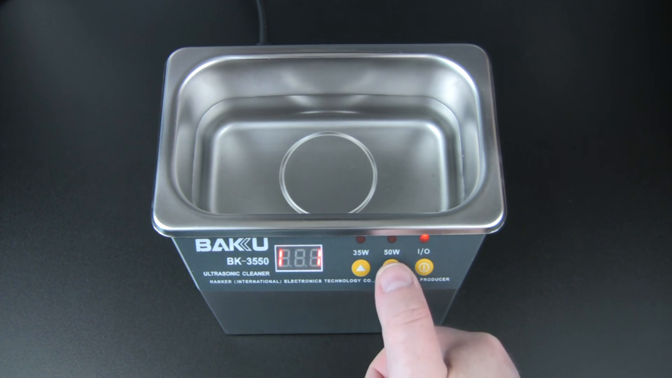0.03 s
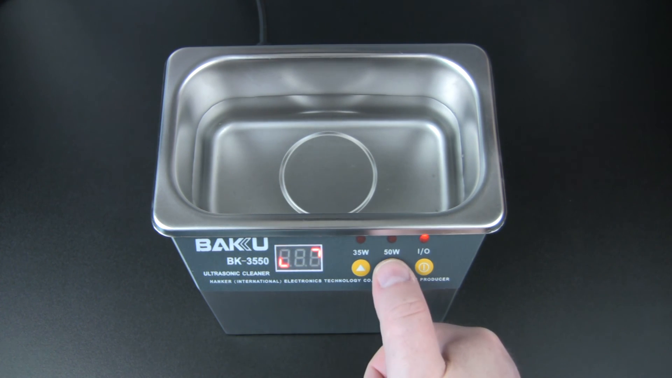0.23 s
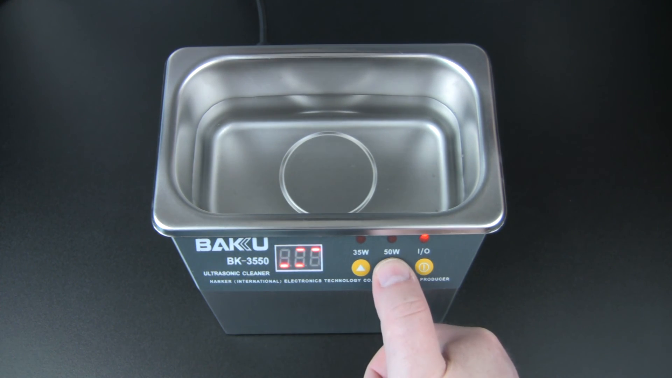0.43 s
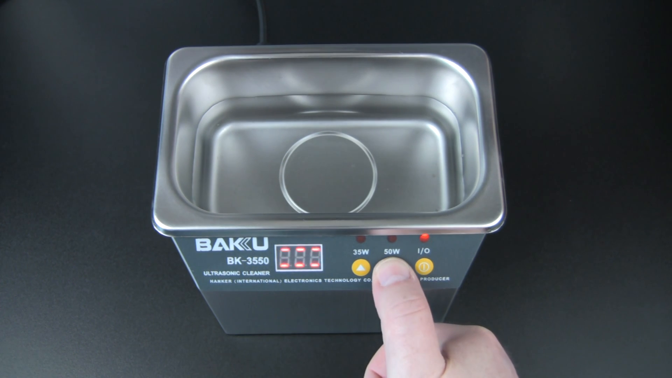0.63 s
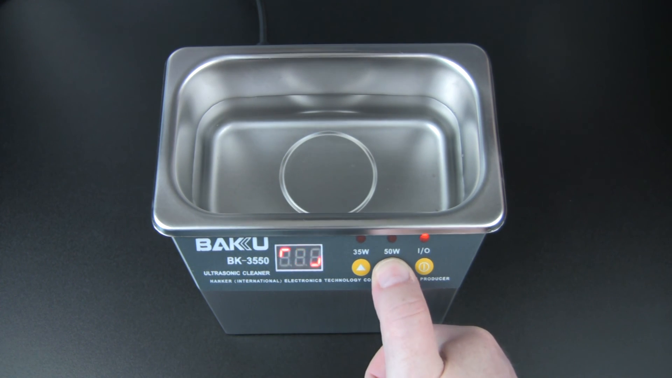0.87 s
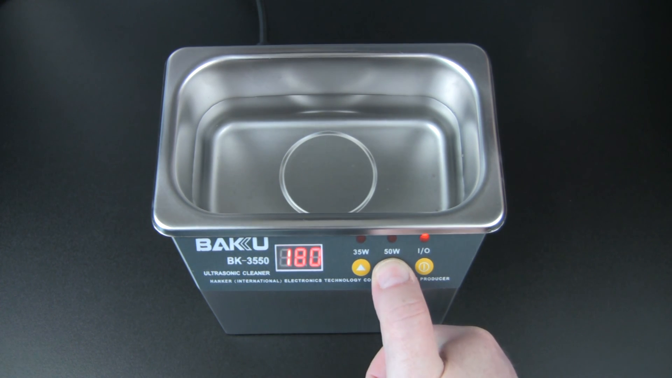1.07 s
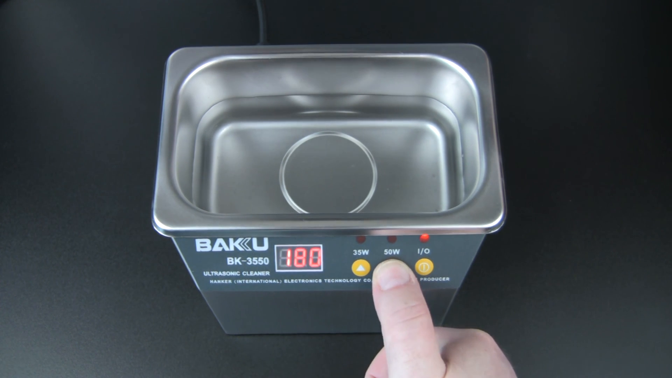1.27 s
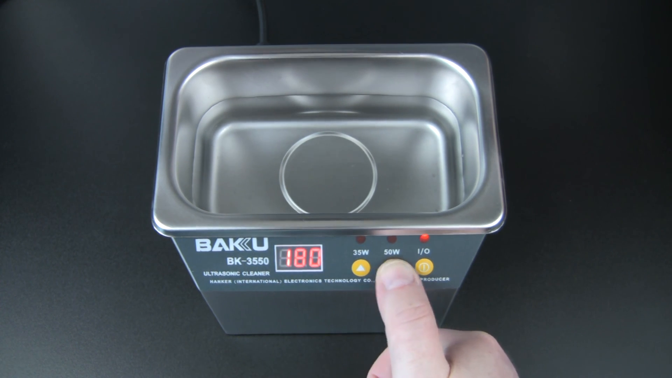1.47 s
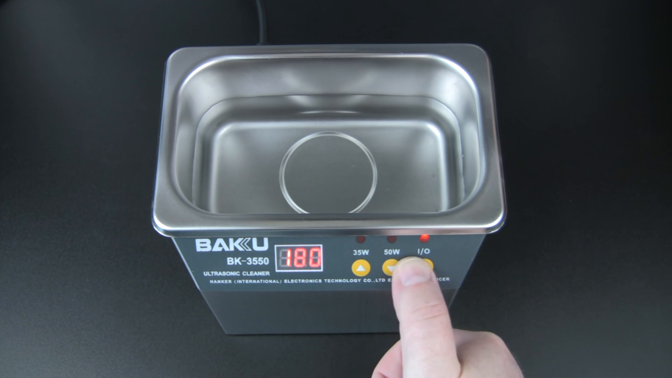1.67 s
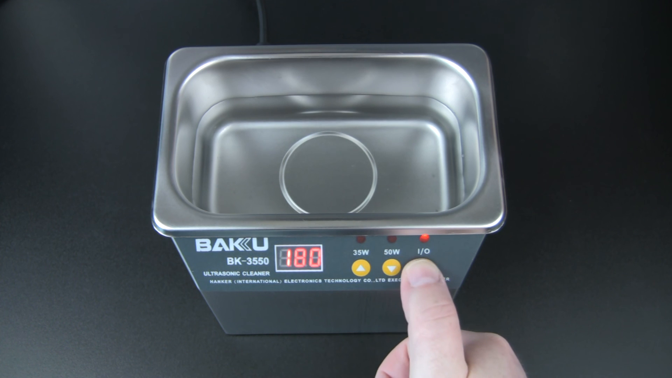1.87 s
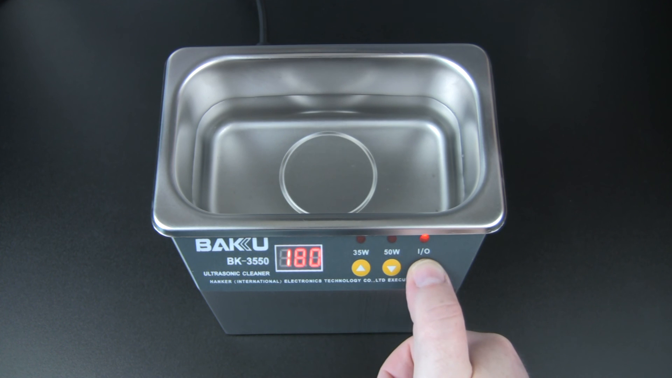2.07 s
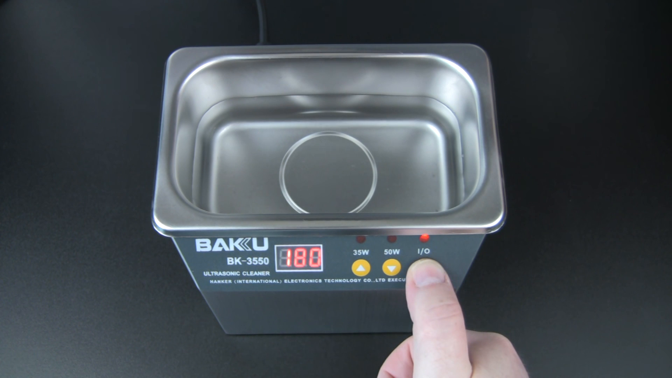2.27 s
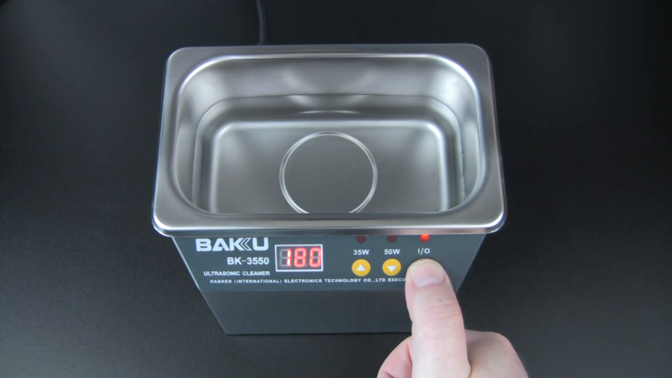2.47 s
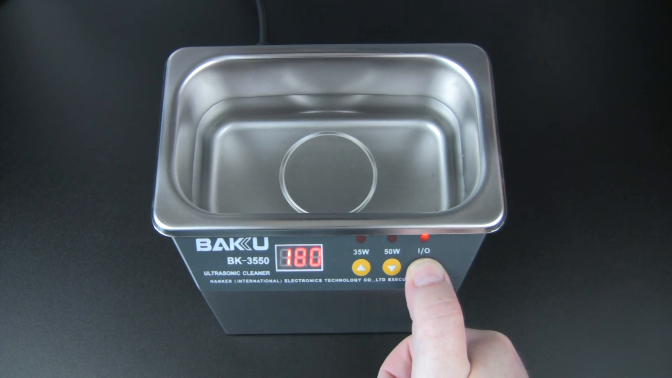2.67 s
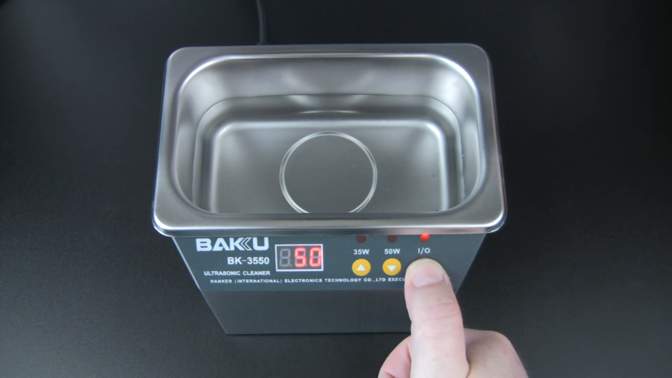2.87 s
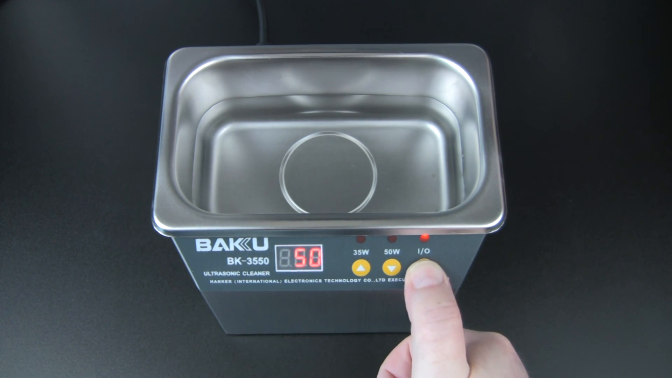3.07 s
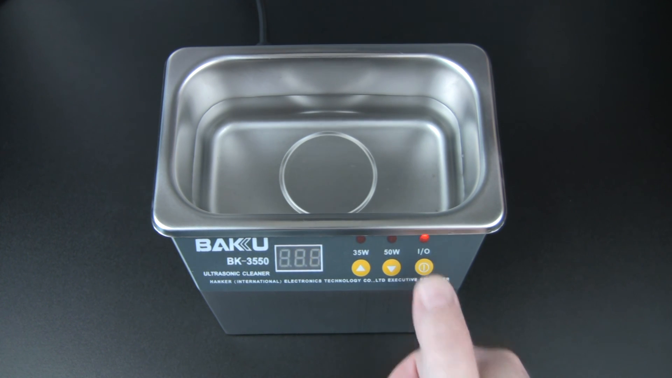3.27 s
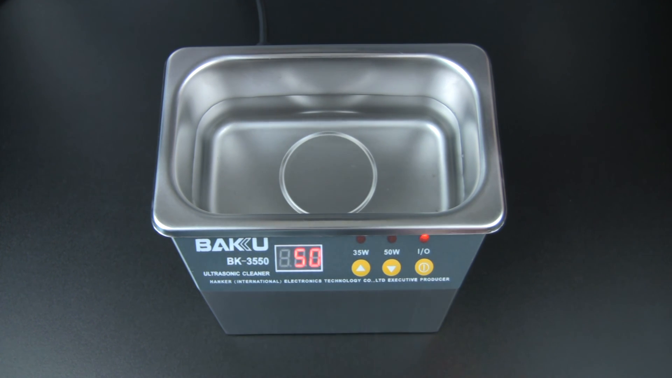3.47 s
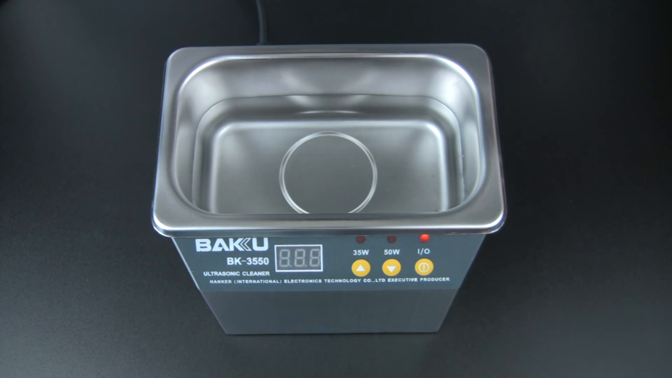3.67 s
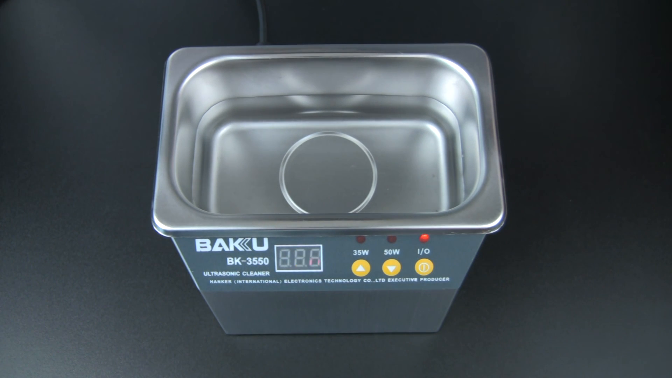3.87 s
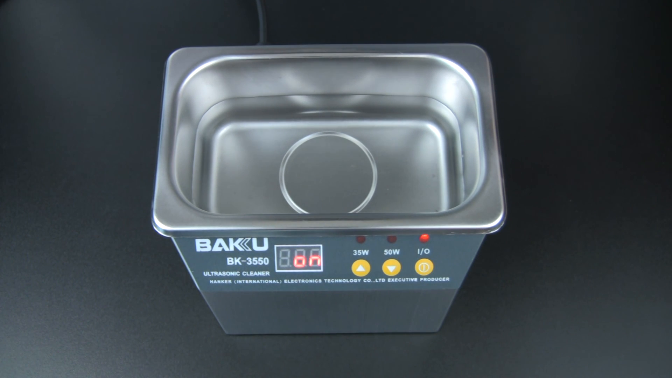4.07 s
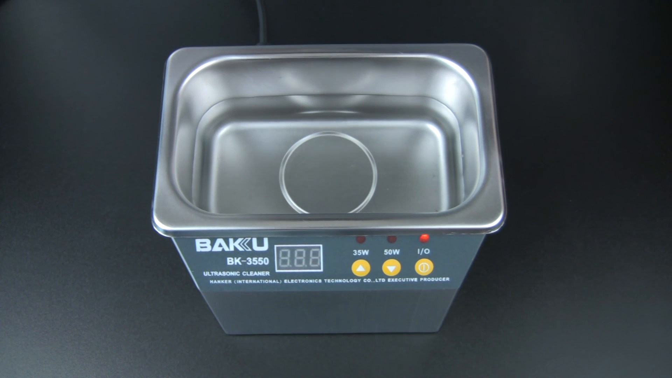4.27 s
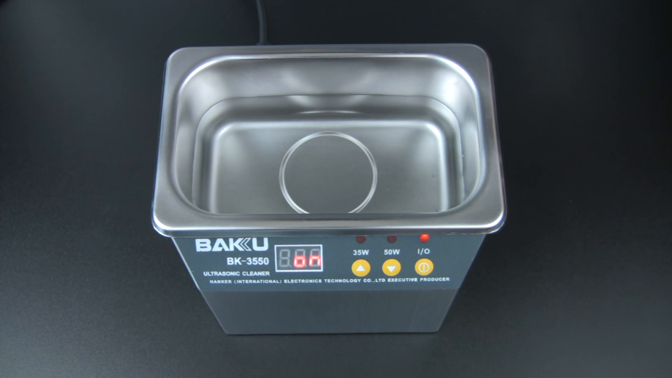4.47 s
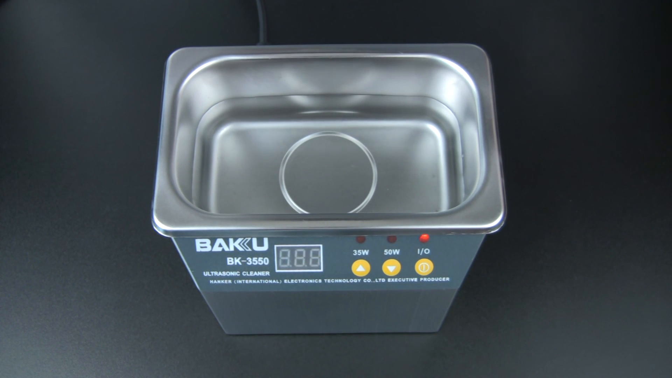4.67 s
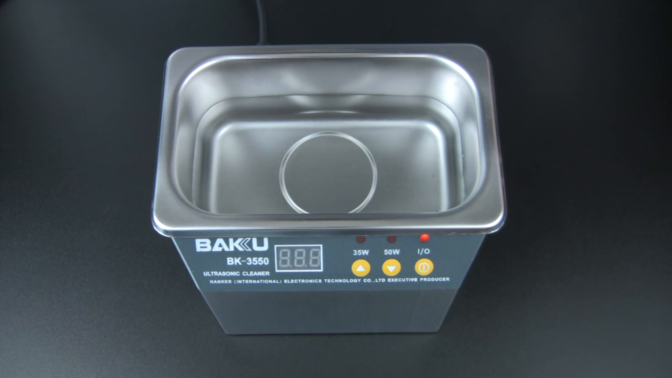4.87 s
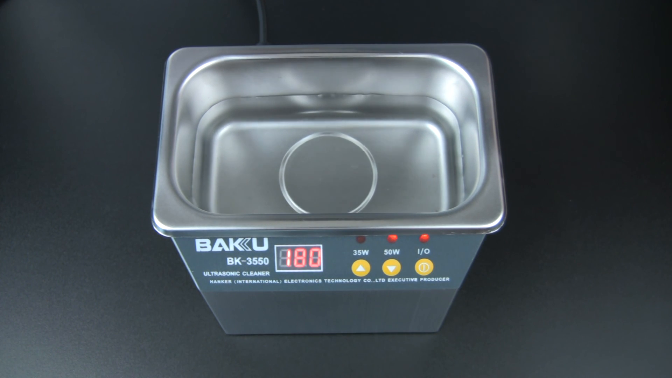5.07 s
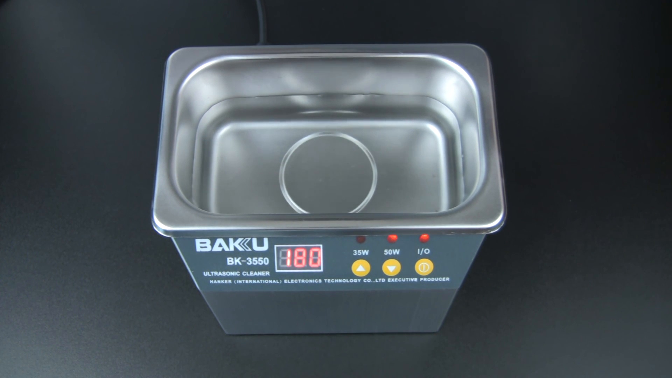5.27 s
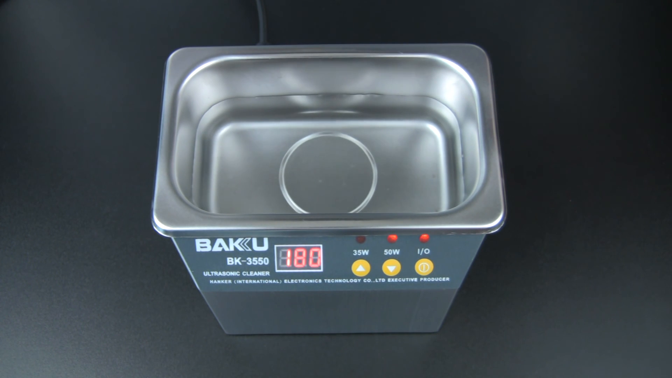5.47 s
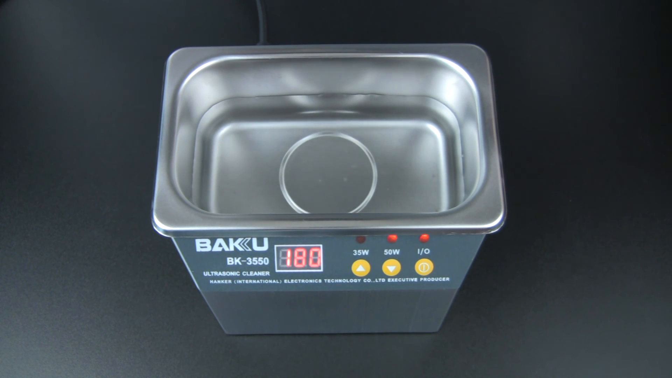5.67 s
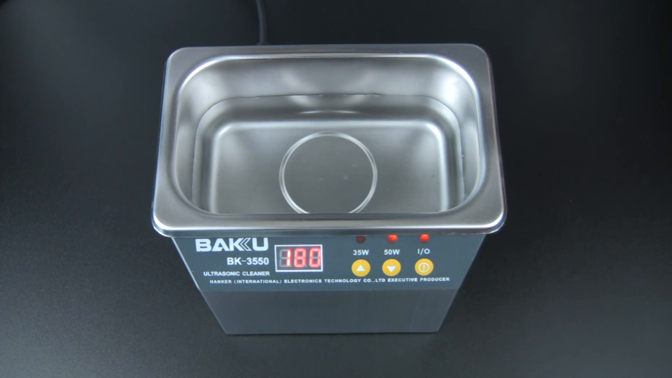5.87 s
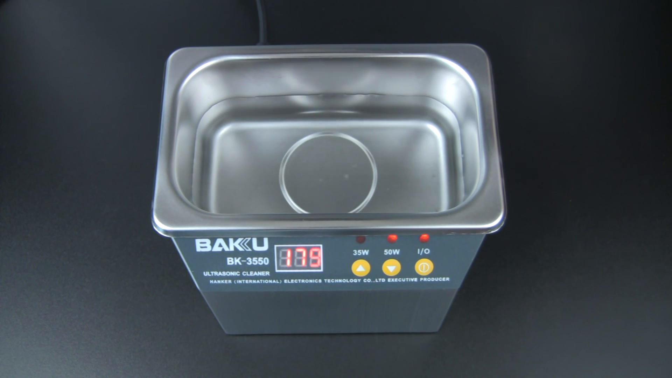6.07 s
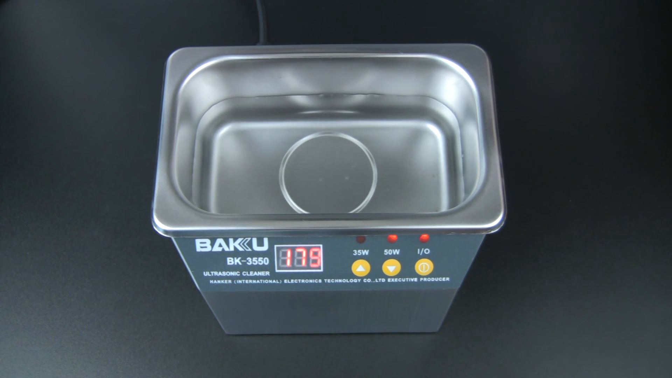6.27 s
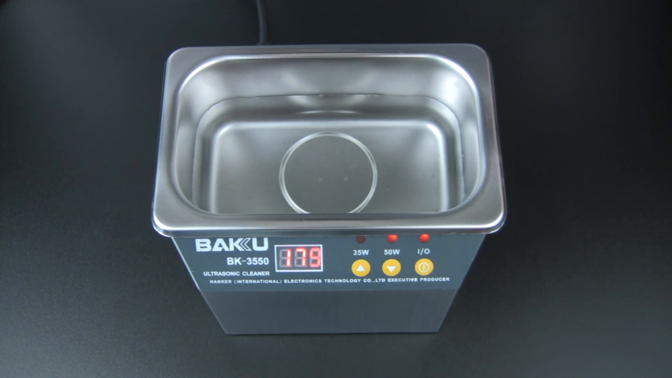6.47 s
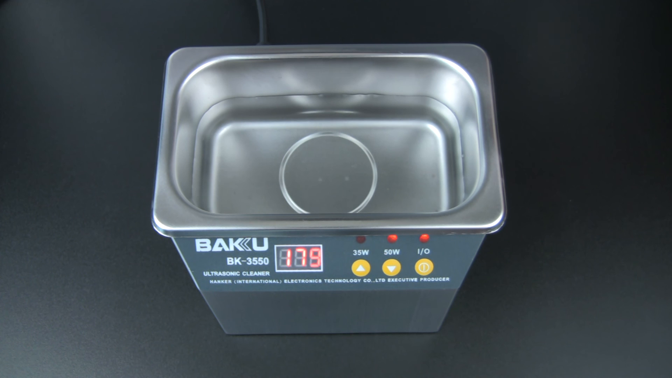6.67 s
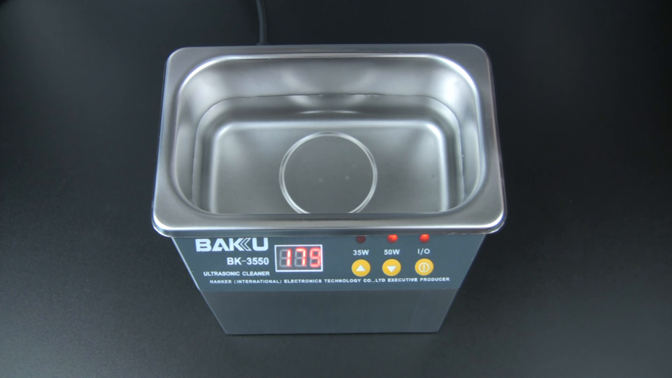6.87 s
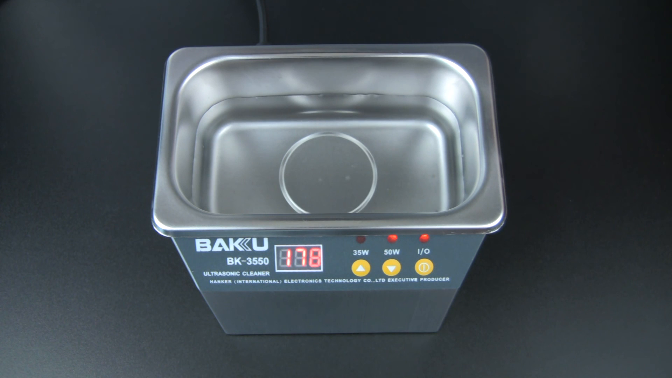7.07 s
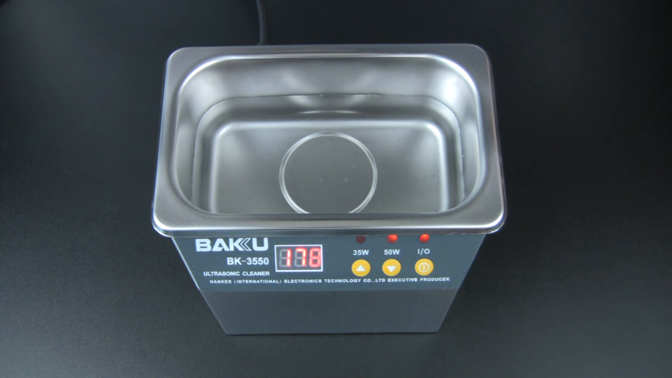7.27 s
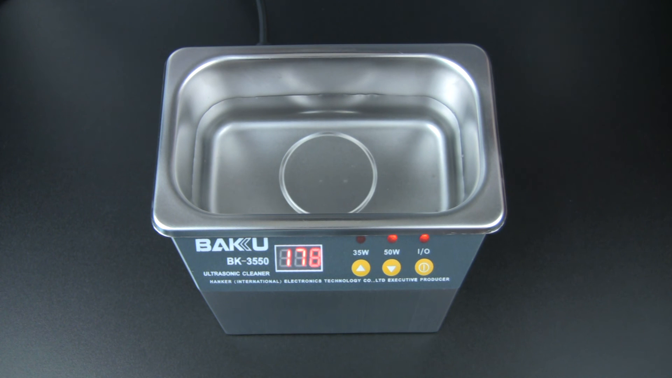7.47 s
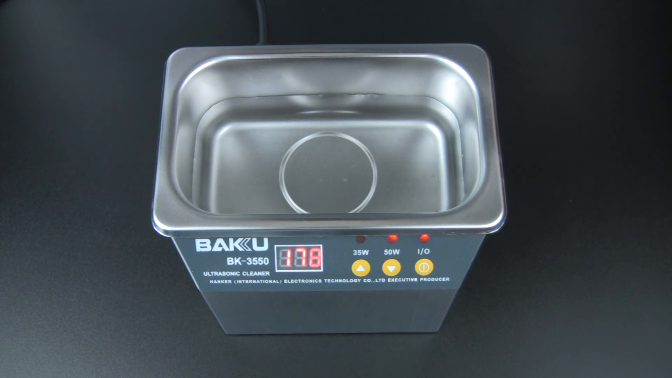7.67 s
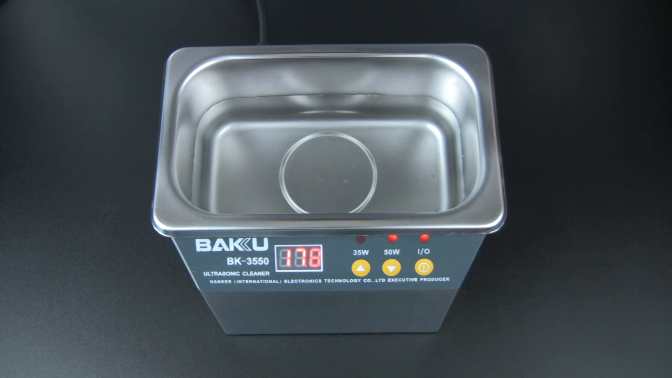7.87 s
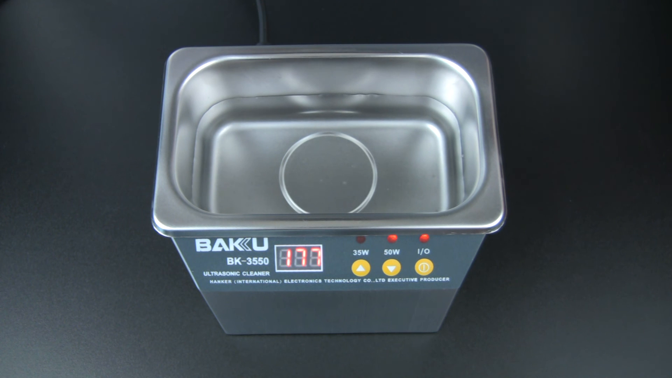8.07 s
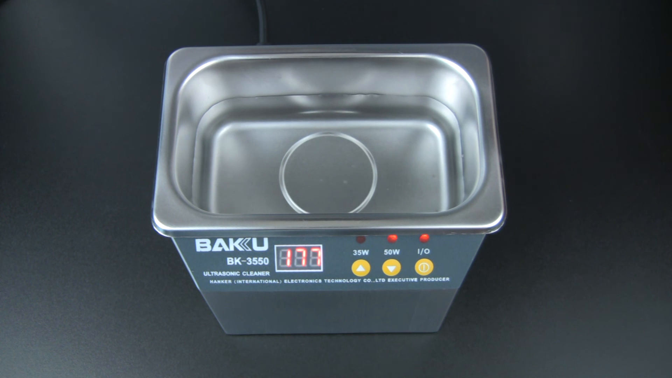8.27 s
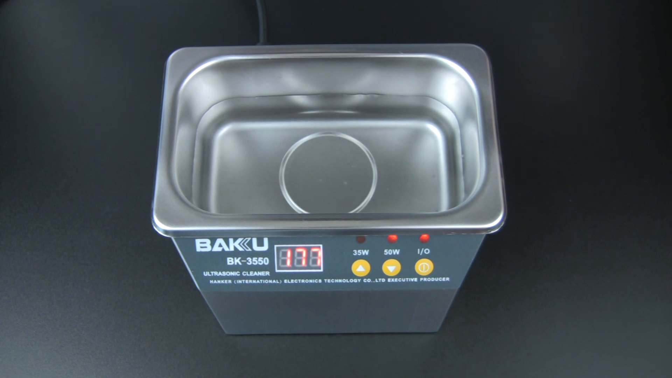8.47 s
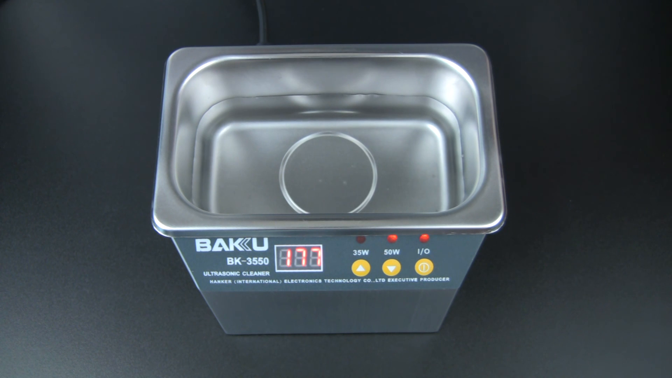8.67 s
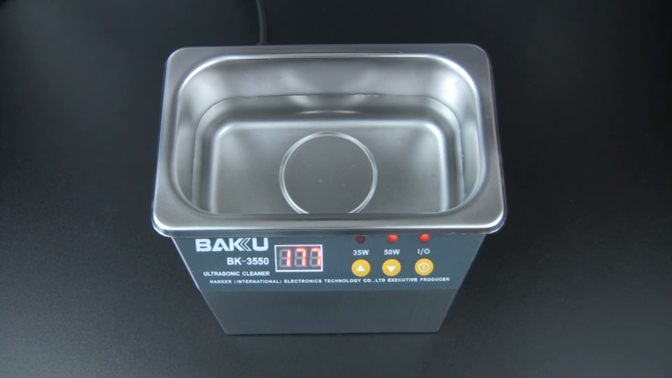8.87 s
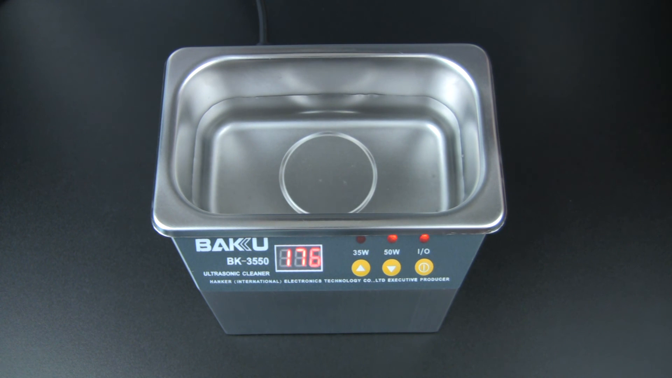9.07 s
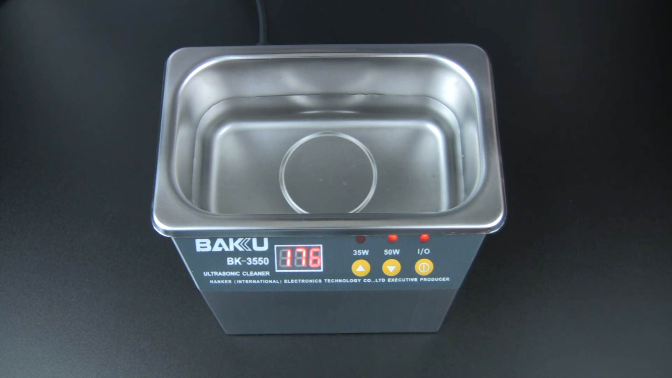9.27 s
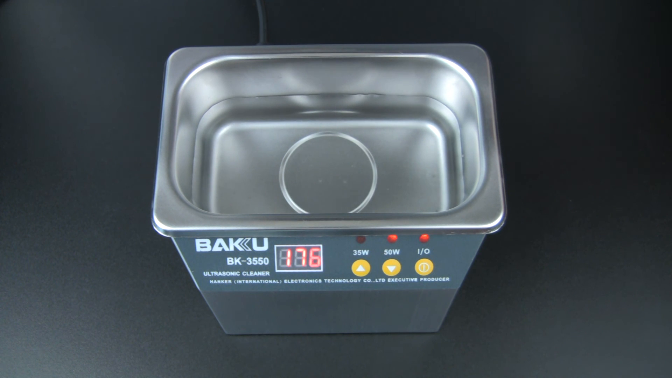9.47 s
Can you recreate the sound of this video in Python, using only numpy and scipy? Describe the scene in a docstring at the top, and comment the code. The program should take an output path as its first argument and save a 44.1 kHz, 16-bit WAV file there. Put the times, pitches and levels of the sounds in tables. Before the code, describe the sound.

A quiet room opens with soft air, faint electrical whines, a barely audible clock tick each second and a deep hum that gently swells. Around 0.7 s a thumb touches a button with a dull faint bump; sharp press and release snaps follow at 0.9 and 1.25 s, the second duller, each ringing the hollow case briefly with a short room tail. A slight touch at 2.6 s leads to a second button's snaps at 2.8 and 3.05 s. Quiet returns until about 4.95 s, when a thin crack and tiny high squeal start the cleaner. At once a loud, raspy buzz near 100 Hz, rich in metallic overtones, runs beneath a dense, bright, sizzling hiss. It holds steady, its treble wavering slightly and its tone shifting subtly from 6 to 8 s, still running at the end around 9.5 s. Close, stereo, with the buzz's bass leaning left.

```python
"""A small ultrasonic cleaner with a steel tank runs in a quiet room: a buzz at twice the mains rate under a hiss.
The buzz is a stack of wandering partials, the hiss is noise with peaks and dips, and a short squeal starts both.
Before that a thumb presses and releases two buttons: each snap is a noise crack plus ringing modes of the case.
Behind it lie still air, a swelling hum and rumble, a faint clock and thin electrical whines."""
import sys
import numpy as np
from scipy import signal
from scipy.fft import rfft, irfft
from scipy.io import wavfile
from scipy.ndimage import map_coordinates

SR = 44100
rng = np.random.default_rng(int(sys.argv[2]) if len(sys.argv) > 2 else 0)


def transcribe(u):
    """Save the signal u as a 16-bit wav file named by the first command-line argument.

    u: samples, shape (n,) or (channels, n), limited to [-1, 1]; the rate is SR.
    q: integer samples, one column per channel.
    """
    v = np.clip(np.atleast_2d(u).T, -1, 1)
    q = np.round(v * 32767).astype(np.int16)
    wavfile.write(sys.argv[1], SR, q)


N = 420713
T = np.arange(N) / SR  # time of each sample, s
HZ = np.fft.rfftfreq(N, 1 / SR)  # frequencies of the whole sound's spectrum

START_S = 4.953  # the cleaner starts
SURGE_HZ = 99.955  # rectified mains drives the transducer: one surge per half cycle

# How the buzz is shared between the ears. Each row: frequency in Hz, left minus right in dB.
BUZZ_BALANCE = [(100, 11.4), (300, 7.5), (400, 3.7), (600, 7), (800, 11.3), (1000, 0.6), (1800, 1.3),
                (2000, 7.4), (2300, 5), (3000, 1.3)]
# How far the buzz is ahead in the left ear. Each row: frequency in Hz, lead in radians.
BUZZ_PHASE = [(100, -3.5), (300, -2.5), (400, -2), (600, -1.5), (700, 1.5), (900, -2), (1100, 1), (8000, 0)]
# Reflections of each knock inside the case. Each row: delay in seconds, level in dB against the knock.
REFLECTIONS = [(.0024, -5), (.0042, -2.5), (.0058, -1)]


def buzz(wander=0.61, wander_hz=0.84, flutter=0.5, flutter_hz=13, size=2048, count=80):
    """Each surge knocks the tank; the partials wander and flutter, the high ones most."""
    hz = np.arange(1, count + 1) * SURGE_HZ
    turns = T * SURGE_HZ  # surges counted so far
    shape = (2, int(turns[-1]) + 2, count)  # ears, surges, partials
    level = gain_of(partial_db(np.arange(shape[1]) / SURGE_HZ, hz))

    # the bass leaves the tank later than the treble
    knock_s, lag_s = 0.0067, 0.001106
    delay = knock_s + lag_s / (1 + (hz / 1400) ** 4)
    # reflections and random scatter change the phases only
    echoes = sum(gain_of(db) * np.exp(-2j * np.pi * hz * s) for s, db in REFLECTIONS)
    reflected = 1 + echoes / (1 + (hz / 1700) ** 3)
    scatter = 0.35 + (hz / 3400) ** 4
    phase = np.angle(reflected) + scatter * rng.standard_normal(count)
    phase = phase - 2 * np.pi * SURGE_HZ * np.cumsum(delay)

    # each ear hears some of the other ear's motion
    slow, fast = drift(shape, wander_hz), drift(shape, flutter_hz)
    slow = evened(slow + 0.5 * slow[::-1])
    fast = evened(fast + 0.5 * fast[::-1])
    loose = hz ** 2 / (hz ** 2 + 1600 ** 2)
    motion = 1 + wander * (0.3 + loose) * slow + flutter * hz / 3000 * fast
    # keep each partial's average power while the cleaner runs
    running_power = np.mean(abs(motion[:, int(START_S * SURGE_HZ):]) ** 2, axis=1, keepdims=True)
    motion = motion / np.sqrt(running_power)

    ear_phase = np.outer([0.5, -0.5], read(BUZZ_PHASE, hz))
    heard = ports(read(BUZZ_BALANCE, hz)) * np.exp(1j * ear_phase)
    partials = level * np.exp(1j * phase) * motion * heard[:, None]

    # one wave shape a surge, each blending into the next
    with_zero_hz = np.pad(partials, ((0, 0), (0, 0), (1, 0)))
    cycles = irfft(with_zero_hz, size) * size / np.sqrt(2)
    place = [turns, turns % 1 * size]
    waves = np.array([map_coordinates(c, place, order=1, mode="grid-wrap") for c in cycles])
    build_s = 0.021  # the tank takes a few surges to ring up
    return (1 - np.exp(-np.maximum(T - START_S, 0) / build_s)) * waves


# Outline of the buzz before the shell shapes it. Each row: frequency in Hz, rms level of a partial in dB.
BUZZ_OUTLINE = [(100, -43), (500, -41.5), (700, -45), (900, -41.5), (1200, -47), (2400, -49.5), (3100, -56),
                (3800, -55.5), (4300, -60), (4500, -51.5), (5200, -61), (5400, -47), (5900, -57.5),
                (6300, -51), (7000, -58.5), (8000, -90)]
# Resonances and hollows of the shell, acting on the nearest partial.
# Each row: frequency in Hz, lift in dB at first, change in dB once settled.
SHELL = [(200, -2.5, 4), (300, 9.5, -2.5), (400, 12, -1), (500, 1, 2), (1000, 1.5, 2), (1100, 8.5, -2.5),
         (1500, -13, 10), (1600, 7, -2.5), (1700, -7, -3), (1800, 8, -2.5), (2100, 2.5, 2.5),
         (2300, 7.5, -0.5), (3300, 5.5, 6.5)]
# Rise and fall of the buzz's treble. Each row: time in seconds, level in dB (only its distance from the mean counts).
BUZZ_TREBLE = [(5.05, -34.5), (6.54, -33), (8.22, -38), (8.49, -33.5), (8.94, -37), (9.41, -35.5),
               (9.5, -36)]


def partial_db(s, hz, shell_width_hz=17, settle_from_s=6.27, settle_s=1.8):
    """The shell lifts or hollows single partials and shifts once as the tank runs; the treble rises and falls."""
    settled = np.clip((s - settle_from_s) / settle_s, 0, 1)[:, None]
    lift_db = sum((db + settled * change_db) / (1 + (2 * (hz - f) / shell_width_hz) ** 2)
                  for f, db, change_db in SHELL)
    at, treble_db = np.transpose(BUZZ_TREBLE)
    # the partials between about 1240 and 3100 Hz follow the treble level
    treble = 1 / (1 + (1240 / hz) ** 8) / (1 + (hz / 3100) ** 8)
    treble_change_db = np.interp(s, at, treble_db - treble_db.mean())
    return read(BUZZ_OUTLINE, hz) + lift_db + np.outer(treble_change_db, treble)


# Broad colour of the hiss. Each row: frequency in Hz, relative level in dB per Hz.
HISS = [(60, -31.5), (200, -13), (400, -22), (800, -14), (1100, -14), (1400, -12.5), (2300, -9.5),
        (3200, -11.5), (4200, -14.5), (7200, -7), (9700, 0.5), (12800, -1.5), (14400, -3), (16000, -7)]
# Peaks and dips in the hiss's colour. Each row: frequency in Hz, width in Hz, lift in dB.
HISS_PEAKS = [(1370, 120, 1.5), (2800, 80, 8), (3200, 140, -16), (3980, 200, -1), (4930, 55, 13.5),
              (5250, 62, -6), (5500, 100, 10), (5900, 320, 10.5), (6370, 91, -1), (8400, 140, 6.5),
              (8650, 72, 8.5), (9700, 140, 3.5), (10120, 89, 2), (10740, 110, 5.5), (11770, 300, 2.5),
              (12600, 90, -2.5), (12460, 160, 9.5)]
# How alike the ears hear the hiss. Each row: frequency in Hz, likeness from -1 to 1.
HISS_SAME = [(60, -.3), (600, -0.65), (1400, -0.17), (3100, 0.49), (6800, 0.46), (15000, 0.22)]
# How the hiss is shared between the ears. Each row: frequency in Hz, left minus right in dB.
HISS_BALANCE = [(100, 5), (1200, 2), (7500, 0), (10000, 2.5), (16000, 1.8)]


def hiss(level_db=-24.5, throb=0.22, swell_db=0.27, swell_hz=3):
    """Fizz of the driven tank: noise coloured by peaks and dips, whose top swells with every surge."""
    lift_db = sum(db / (1 + (2 * (HZ - hz) / width) ** 2) for hz, width, db in HISS_PEAKS)
    lift_db = lift_db + 1.9 * ripple(45)
    colour = gain_of(read(HISS, HZ) + lift_db) * ports(read(HISS_BALANCE, HZ))
    fizz = noise(colour, read(HISS_SAME, HZ), N)
    top = irfft(rfft(fizz) / (1 + (10500 / (HZ + 1)) ** 8), N)
    turns = T * SURGE_HZ
    fizz = fizz + throb * np.cos(2 * np.pi * (turns + 0.19)) * top
    # the whole hiss also swells a little at random
    swell = evened(drift((int(turns[-1]) + 2, 1), swell_hz).real[:, 0])
    swell = np.interp(turns, np.arange(len(swell)), swell)
    return gain_of(level_db + swell_db * swell) * fizz * running()


def running(rise_s=0.0046):
    """The drive: off, then a quick even rise to fully on."""
    return np.clip((T - START_S) / rise_s, 0, 1)


# Squeal as the oscillator locks on.
# Each row: start in seconds, pitch in Hz, level in dB before the ears share it, length in seconds.
SQUEALS = [(4.955, 10500, -14, 0.0036), (4.9553, 8000, -14, 0.0084)]


def start_up(crack_db=-20, ring_db=-17, ring_t60=0.12, thin_hz=900):
    """Switching on gives a thin crack, and the oscillator squeals at two pitches that ring on faintly."""
    out, t = np.zeros((2, N)), np.arange(SR // 4) / SR
    crack = burst(corner_hz=15000, hold_s=0.0057, fall_s=0.011, room_db=-4.5)
    thin_crack = signal.lfilter(*signal.butter(1, thin_hz, "high", fs=SR), crack)
    add(out, START_S, gain_of(crack_db) * thin_crack)
    for s, hz, db, length in SQUEALS:
        rise = np.minimum(t / length, 1)
        swell = np.sin(np.pi * rise) + gain_of(ring_db - 60 * t / ring_t60) * rise
        add(out, s, gain_of(db) * swell * np.sin(2 * np.pi * hz * t) * ports(4.3)[:, None])
    return out


# Touches and switch snaps. Each row: start in seconds, force in dB, button (0 timer, 1 power),
# corner in Hz above which the crack is dulled, extra crack level in dB.
SNAPS = [(0.680, -18.5, 0, 1500, -10), (0.899, 1, 0, 11400, -.5), (1.253, 4, 0, 3340, -1.5),
         (2.590, -11.5, 0, 8000, -16), (2.783, -1.5, 1, 12900, 0), (3.052, 0.5, 1, 3980, -2.5)]
# Ringing modes of case and tank. Each row: pitch in Hz, time in seconds to fall by 60 dB,
# level in dB from the timer button, level in dB from the power button (both at a force of 0 dB).
MODES_OF_CASE = [(268, 0.18, -48, -40), (337, 0.089, -22, -22.5), (383.6, 0.23, -23, -31),
                 (432, 0.31, -48, -34.5), (568, 0.35, -43, -36), (603, 0.42, -41, -41),
                 (714, 0.19, -45, -33), (809, 0.087, -26, -25), (881, 0.12, -27, -27),
                 (1013, 0.36, -42, -29.5), (1110, 0.14, -46, -31), (1370, 0.14, -58, -36),
                 (1570, 0.1, -33, -28.5), (1643, 0.12, -33.5, -36), (2154, 0.11, -30.5, -48),
                 (3240, 0.22, -45, -59), (4800, 0.1, -46, -54)]


def buttons(crack_db=-25.0, rise_cycles=2.3, soft_hz=3000, crest_s=0.008):
    """Each snap cracks and rings the case; low modes take longer to build, and the room returns them once."""
    out, t = np.zeros((2, N)), np.arange(SR // 2) / SR
    echo_s, echo_db, echo_hz = 0.0391, -4.5, 600  # one dull echo
    for s, force_db, button, corner_hz, snap_db in SNAPS:
        ring = 0
        for hz, t60, timer_db, power_db in MODES_OF_CASE:
            mode_db = power_db if button > 0.5 else timer_db
            softness_db = min(force_db, 0) * hz / soft_hz  # a soft touch hardly reaches the high modes
            fade = gain_of(mode_db + softness_db - 60 * t / t60)
            build = 1 - np.exp(-t * hz / rise_cycles)
            ring = ring + fade * build * np.sin(2 * np.pi * hz * (t - crest_s))
        ring = gain_of(force_db) * ring * ports(1.7)[:, None]
        add(out, s, ring)
        echo = signal.lfilter(*signal.butter(2, echo_hz, fs=SR), ring)
        add(out, s + echo_s, gain_of(echo_db) * echo)
        crack = burst(corner_hz, hold_s=0.0061, fall_s=0.0064, room_db=-5.5)
        add(out, s, gain_of(force_db + crack_db + snap_db) * crack)
    return out


# Colour of a crack. Each row: frequency in Hz, relative level in dB per Hz.
CRACK = [(100, -11), (300, 0), (850, -0.5), (1300, -4.5), (2500, -8), (3200, -6), (4000, -10), (5700, -6.5),
         (10000, -6), (12500, -10.5), (16000, -21)]
# How long the room rings. Each row: frequency in Hz, time in seconds to fall by 60 dB.
ROOM_T60 = [(200, 0.51), (1000, 0.43), (3000, 0.27), (6000, 0.22), (14000, 0.14)]


def burst(corner_hz, hold_s, fall_s, room_db, size=22050):
    """A crack: a few milliseconds of dense rattle, then the room's tail, whose treble dies first."""
    t, hz = np.arange(size) / SR, np.fft.rfftfreq(size, 1 / SR)
    colour = gain_of(read(CRACK, hz))
    dulled = colour / np.sqrt(1 + (hz / corner_hz) ** 6)
    same = 0.98 / (1 + (hz / 6000) ** 3)  # the bass is nearly alike in both ears
    near = noise(dulled, same, size) * np.exp(-np.maximum(t - hold_s, 0) / fall_s)
    # fade each frequency of the tail at its own speed
    f, at, z = signal.stft(noise(dulled, 0.98 * same, size), SR, nperseg=256)
    fade = gain_of(-60 * at / read(ROOM_T60, f)[:, None])
    tail = signal.istft(z * fade, SR, nperseg=256)[1][:, :size]
    sound = near * np.minimum(t / 0.00085, 1) + gain_of(room_db) * tail * np.minimum(t / 0.018, 1)
    # a duller crack is also weaker
    return sound * np.linalg.norm(dulled) / np.linalg.norm(colour)


# Colour of the still air. Each row: frequency in Hz, relative level in dB per Hz.
FLOOR = [(20, -40), (36, -23), (70, -7), (240, -8), (370, -6), (500, -12), (800, -12), (1150, -15),
         (1450, -22), (1900, -27), (3200, -31), (7600, -36), (11800, -32.5), (12600, -43), (16000, -53)]
# How alike the ears hear the air. Each row: frequency in Hz, likeness from -1 to 1.
FLOOR_SAME = [(60, 0.39), (130, -0.3), (290, -0.33), (640, 0.5), (1400, 0.56), (3100, 0.14), (7000, -0.093),
              (15000, -0.55)]
# Swells of the deep hum. Each row: time of the crest in seconds, half length in seconds, level in dB.
HUM_SWELLS = [(.75, .25, -62), (2.15, 0.35, -55), (2.65, .27, -53.5), (3.95, 0.41, -54), (4.85, .6, -61)]
# The one swell of the low rumble. Each row: time of the crest in seconds, half length in seconds, level in dB.
RUMBLE_SWELLS = [(0.697, 0.34, -50.5)]


def room_tone(air_db=-47.5, hum_hz=60, hum_rest_db=-67, rumble_rest_db=-66):
    """Still air, a deep hum, a low rumble and the blurred tick of a far clock, mostly shaped noise."""
    air_colour = gain_of(read(FLOOR, HZ) + 2 * ripple(30))
    air = gain_of(air_db) * noise(air_colour, read(FLOOR_SAME, HZ), N)
    hum_noise = hump(hz=hum_hz, width_hz=4.2, same=0.55)
    hum = evened(np.sin(2 * np.pi * hum_hz * T) + 0.35 * hum_noise)
    rumble = hump(hz=103, width_hz=14, same=0.6)
    low = swelling(hum_rest_db, HUM_SWELLS) * hum + swelling(rumble_rest_db, RUMBLE_SWELLS) * rumble
    # the clock ticks softly and evenly
    first_tick_s, tick_every_s, tick_db, tick_s = 0.18, 1.0, -57, 0.026
    tick_times = np.arange(first_tick_s, N / SR, tick_every_s)
    ticking = sum(gain_of(tick_db) / (1 + ((T - at) / tick_s) ** 2) for at in tick_times)
    return air + low + ticking * hump(hz=2060, width_hz=600, same=0.59)


def swelling(rest_db, swells):
    """A resting level with bell-shaped swells on top; their powers add."""
    power = gain_of(rest_db) ** 2
    for s, half_s, db in swells:
        power = power + (gain_of(db) * np.exp(-((T - s) / half_s) ** 2)) ** 2
    return np.sqrt(power)


# The clearest thin electrical whines. Each row: pitch in Hz, rms level in dB.
WHINES = [(4199, -79), (5399, -81), (5722, -80), (9152, -80), (11332, -81)]


def whines(faint_db=-87, slope_db=1, count=50):
    """Steady pure tones: a few clear electrical whines among fainter ones that weaken by the kilohertz."""
    hz, spread_db = rng.uniform(3000, 15000, count), 3 * rng.standard_normal(count)
    faint = list(zip(hz, faint_db + spread_db - slope_db * (hz - 3000) / 1000))
    spectrum = np.zeros((2, len(HZ)), complex)
    for f, db in list(WHINES) + faint:
        turn = rng.random() + rng.random(2) / 4  # at most a quarter turn between the ears
        spectrum[:, round(f * N / SR)] = gain_of(db) * np.exp(2j * np.pi * turn)
    return irfft(spectrum, N) * N / np.sqrt(2)


def gain_of(db):
    """Decibels to amplitude."""
    return 10 ** (np.asarray(db) / 20)


def evened(x):
    """Scales to an rms of one."""
    return x / np.sqrt(np.mean(abs(x) ** 2) + 1e-20)


def read(points, hz):
    """Joins a table's points on a log-frequency axis."""
    f, value = np.transpose(points)
    return np.interp(np.log(hz + 1), np.log(f + 1), value)


def add(mix, s, sound):
    """Lays a sound into the stereo mix at a time in seconds."""
    part = mix[:, round(s * SR):][:, :sound.shape[-1]]
    part += sound[..., :part.shape[1]]


def ports(balance_db):
    """Left and right gains of constant total power."""
    pair = gain_of(np.array([balance_db, -balance_db]) / 2)
    return pair / np.sqrt(np.mean(pair ** 2, axis=0))


def noise(gain, same, size):
    """Stereo noise of rms one with a given spectrum and left-right likeness."""
    a, b = rfft(rng.standard_normal((2, size)))
    same = np.clip(same, -1, 1)
    right = same * a + np.sqrt(1 - same ** 2) * b
    return evened(irfft(gain * np.array([a, right]), size))


def hump(hz, width_hz, same):
    """Noise gathered around one frequency."""
    return noise(1 / (1 + ((HZ - hz) / width_hz) ** 2), same, N)


def ripple(size_hz):
    """A random fine curve over frequency, like the many small modes of a shell or a room."""
    knots = np.arange(0, SR / 2, size_hz)
    return np.interp(HZ, knots, rng.standard_normal(len(knots)))


def drift(shape, rate_hz):
    """Complex random motion, mostly slower than a rate; the last axis but one counts surges."""
    z = rng.standard_normal(shape) + 1j * rng.standard_normal(shape)
    f = np.fft.fftfreq(shape[-2], 1 / SURGE_HZ)[:, None]
    return evened(np.fft.ifft(z / (1 + (f / rate_hz) ** 2), axis=-2))


def scene():
    """The running cleaner, its start and its buttons, over the room."""
    return buzz() + hiss() + start_up() + buttons() + room_tone() + whines()


def record(dry, edge_hz=15770):
    """The recorder's band limit: a steep filter removes everything above the edge."""
    low_pass = signal.firwin(1023, edge_hz, window=("kaiser", 9), fs=SR)
    return signal.oaconvolve(dry, low_pass[None], "same")


dry = scene()
out = record(dry)
transcribe(out)
```